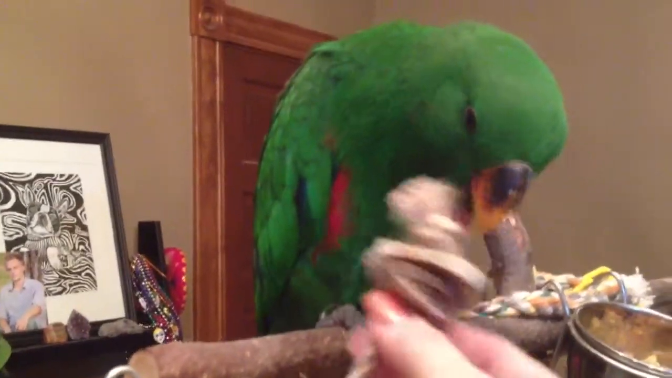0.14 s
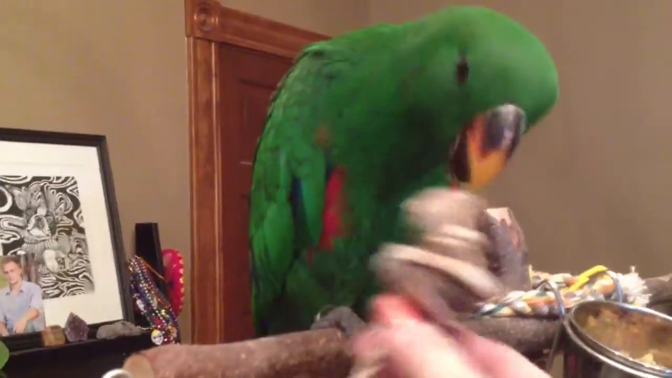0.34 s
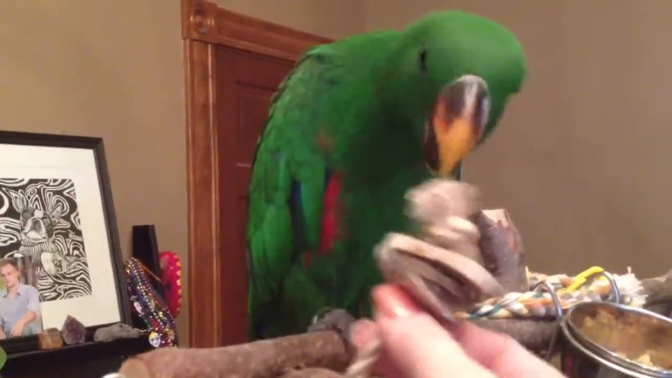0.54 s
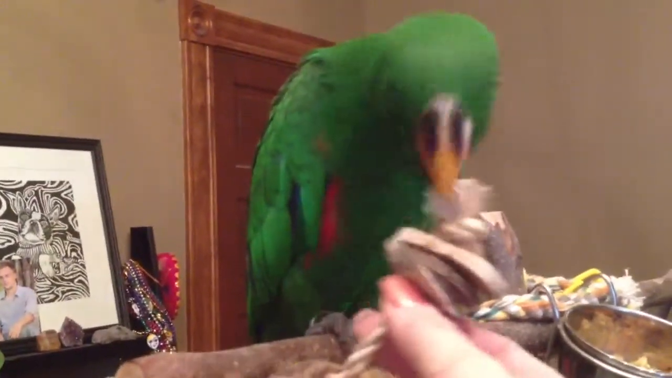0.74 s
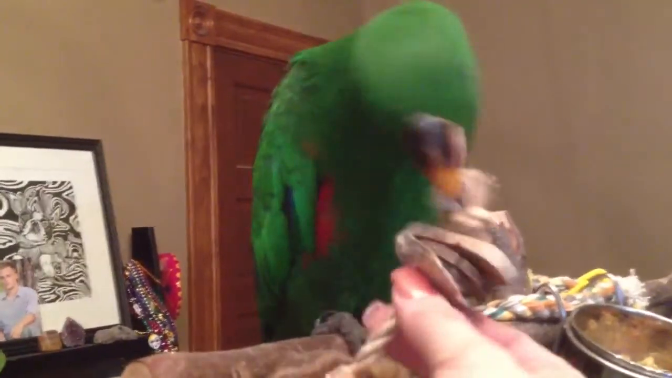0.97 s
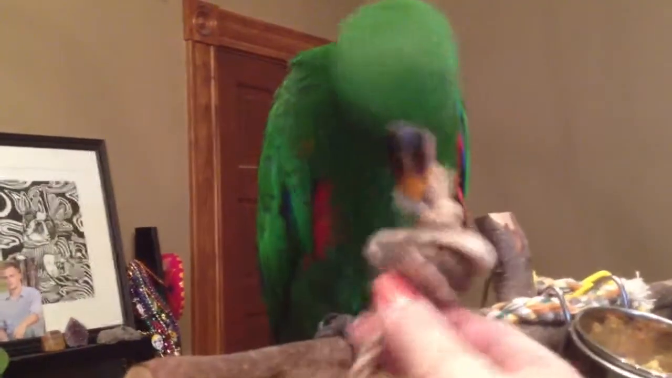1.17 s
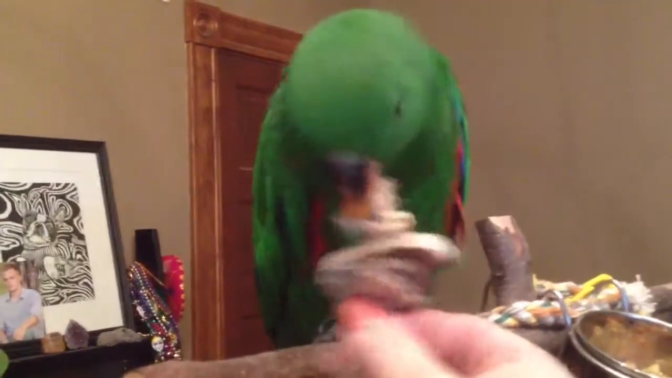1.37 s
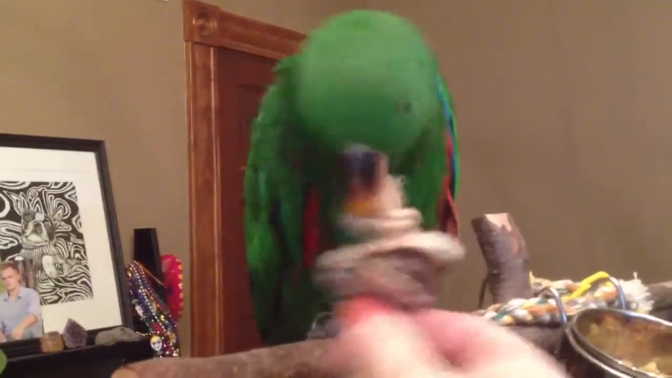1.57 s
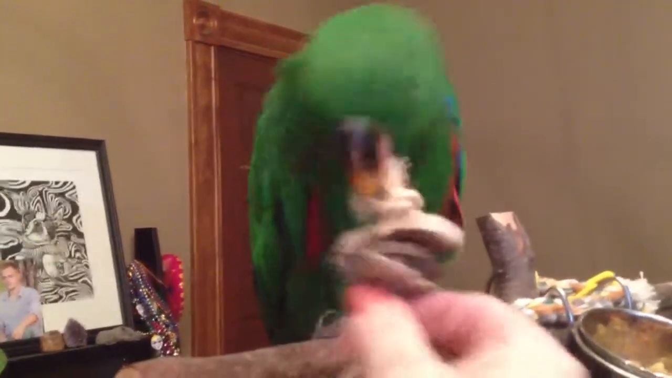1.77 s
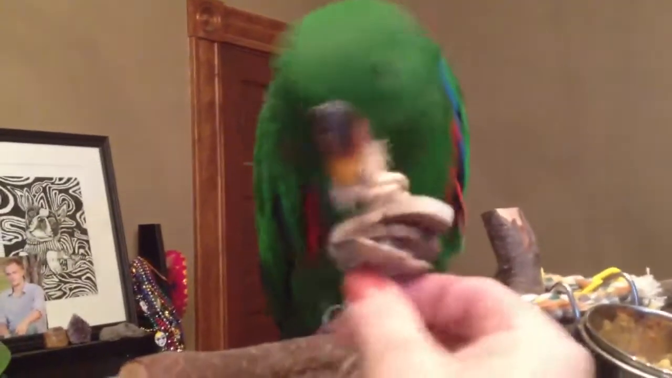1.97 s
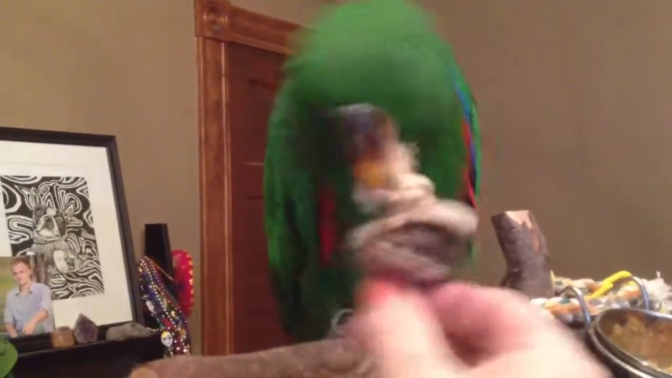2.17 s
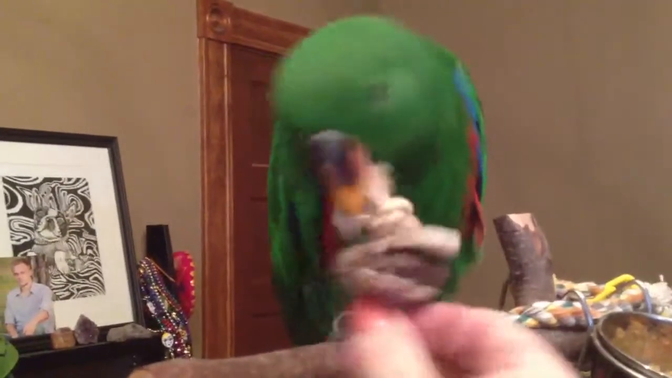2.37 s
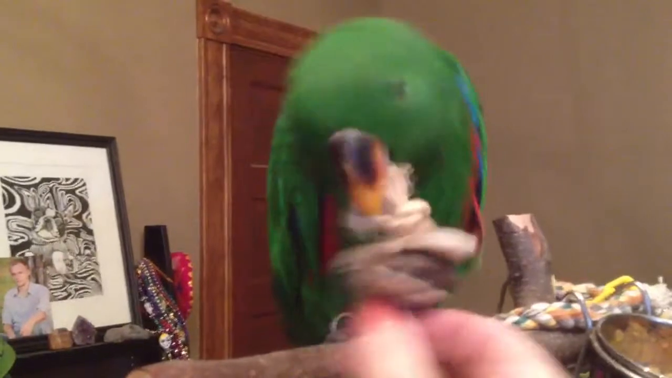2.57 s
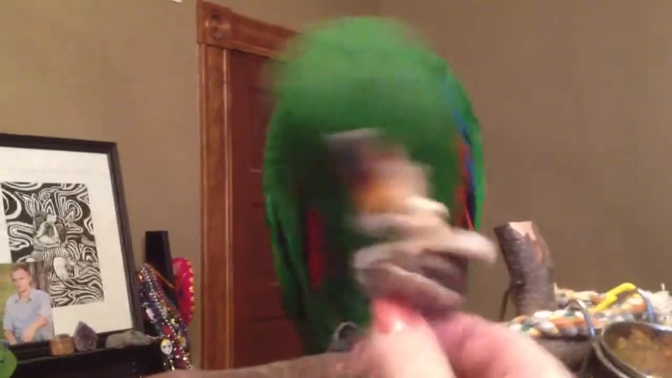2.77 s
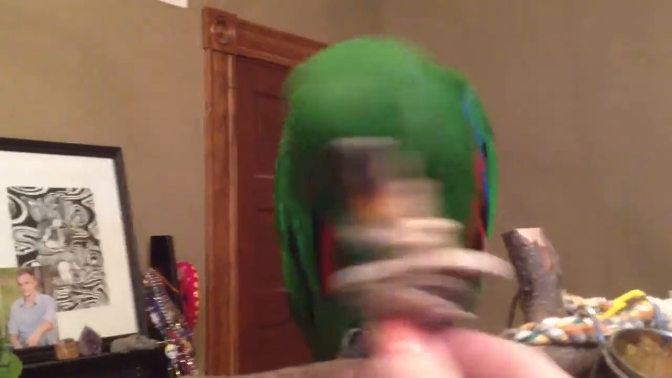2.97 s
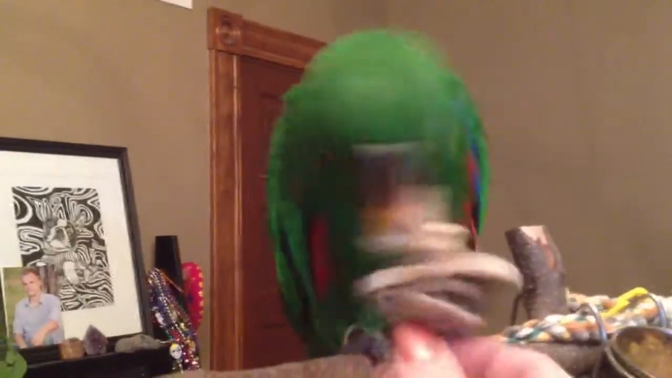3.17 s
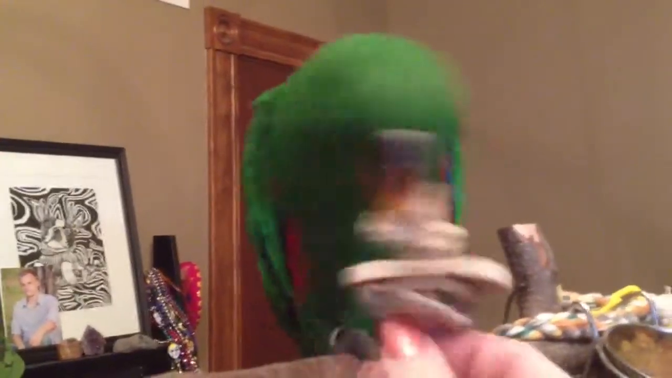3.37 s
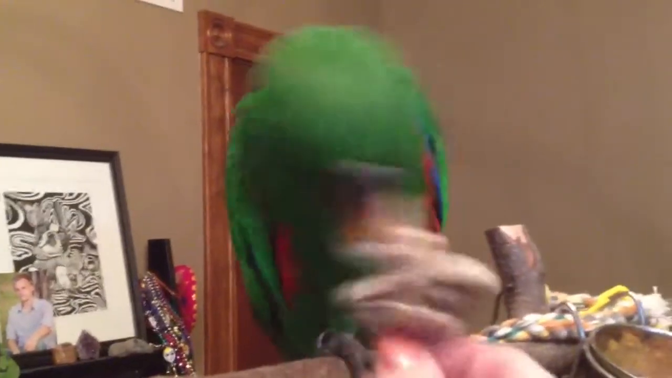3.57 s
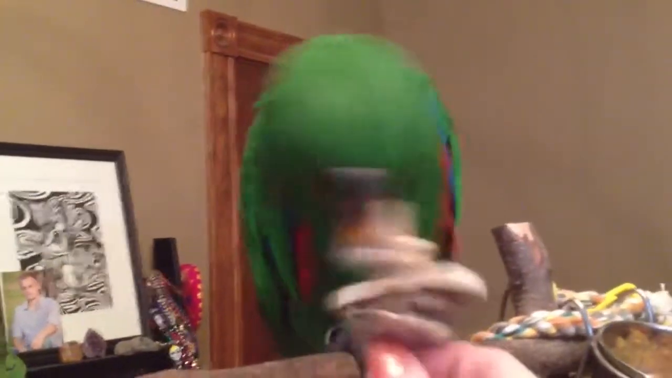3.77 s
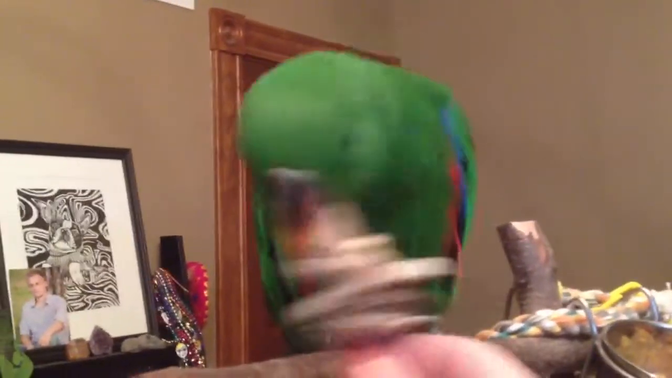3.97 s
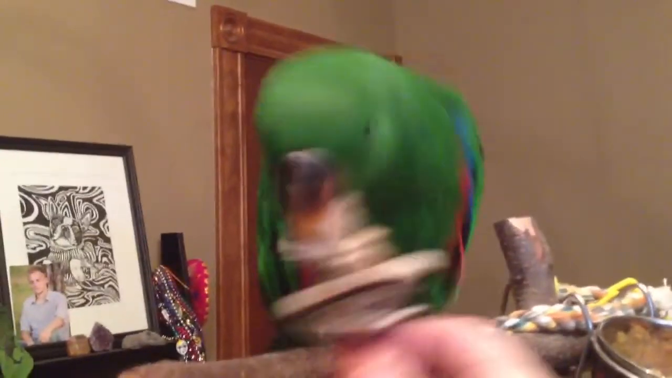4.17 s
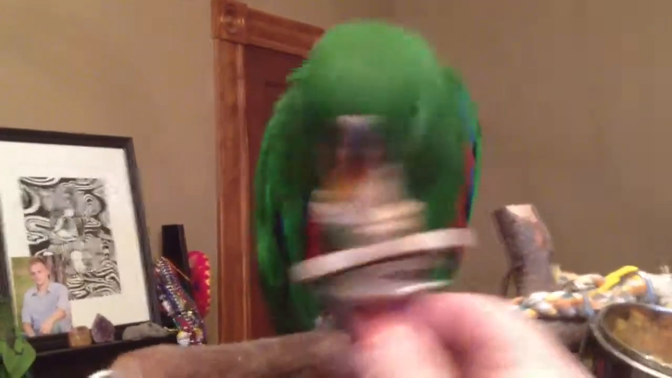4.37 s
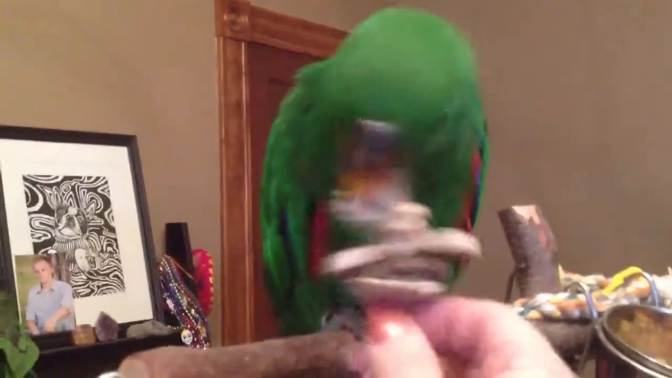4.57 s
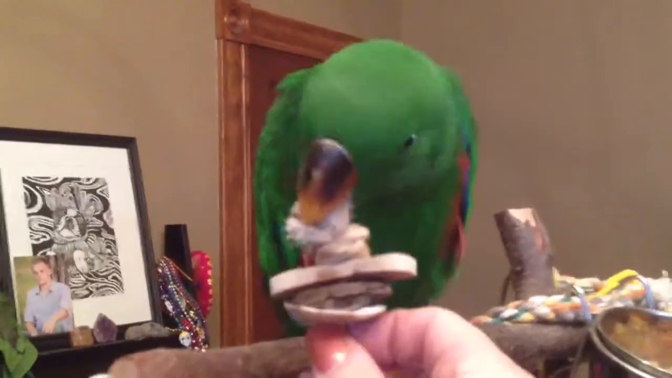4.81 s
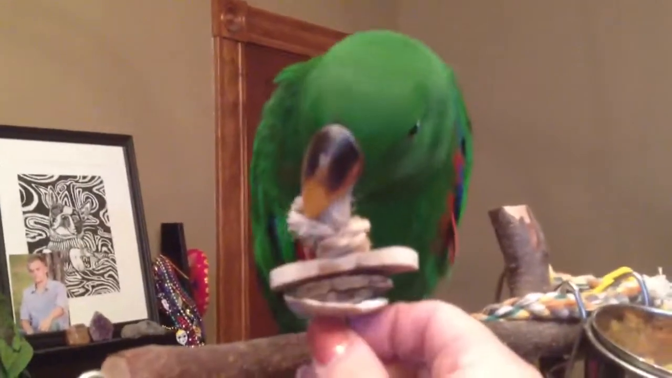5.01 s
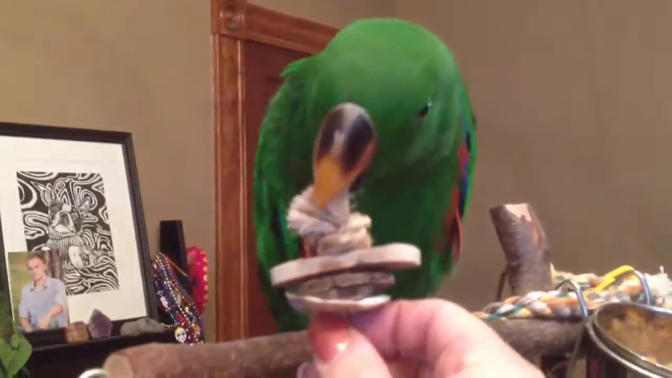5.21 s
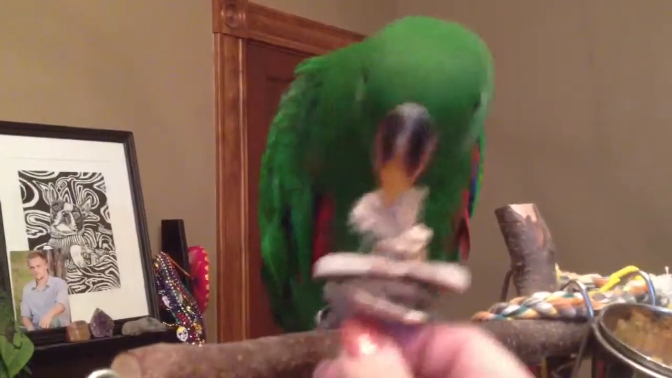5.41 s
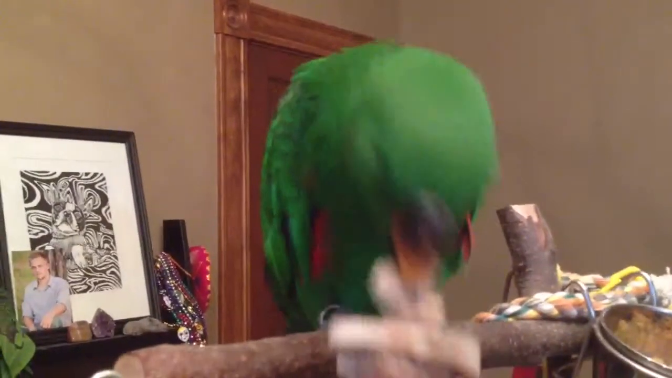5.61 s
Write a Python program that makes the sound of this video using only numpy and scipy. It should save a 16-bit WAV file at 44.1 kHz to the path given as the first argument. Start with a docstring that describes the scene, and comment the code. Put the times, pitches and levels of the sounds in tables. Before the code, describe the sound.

A parrot nibbles a rope toy strung with hard discs, then shakes it fast, making dense bright clacking that stops abruptly into quiet scrapes.

```python
"""Parrot shaking a rope toy

A parrot nibbles a rope toy strung with hard discs, then shakes it about five times a second, close by.
Disc contacts are noise-chattered knocks plus decaying modes; rope, fibres and beak are filtered random slips.
Swings and tugs add a drag of rope and a hollow swish; a small metal link rings faintly near the end.
A soft noise thump comes late; decaying-noise tails give the toy a small room, over air and a faint hum."""
import sys
import numpy as np
from scipy import signal
from scipy.fft import rfft, irfft, next_fast_len
from scipy.io import wavfile
from scipy.ndimage import map_coordinates

SR = 44100
rng = np.random.default_rng(int(sys.argv[2]) if len(sys.argv) > 2 else 0)


def persist_wave(psi):
    """Save psi, clipped to +-1, as 16-bit WAV."""
    counts = np.round(np.clip(psi, -1, 1) * 32767).astype(np.int16)
    wavfile.write(sys.argv[1], SR, np.atleast_2d(counts).T)


N = 249076
TIME_S = np.arange(N) / SR
TOP_HZ = 15200  # upper band limit


def amp(db):
    """Amplitude factor of a level in dB."""
    return 10 ** (np.asarray(db) / 20)


def unit(x):
    """x scaled to rms 1."""
    return x / np.sqrt(np.mean(x ** 2) + 1e-20)


def along(points, hz):
    """Interpolate (f/Hz, value) points on a log frequency axis."""
    f, v = np.transpose(points)
    return np.interp(np.log(hz + 1), np.log(f + 1), v)


def curves(rows):
    """One value per sample for each column after the time."""
    s, *cols = np.transpose(rows)
    return [np.interp(TIME_S, s, c) for c in cols]


def wobble(rate_hz):
    """Smooth random curve through rate_hz knots per second."""
    knots = rng.standard_normal(int(N * rate_hz / SR) + 4)
    return map_coordinates(knots, [np.arange(N) * rate_hz / SR])


def bell(s, length_s):
    """Gaussian rise and fall of one stroke centred on s."""
    return np.exp(-.5 * np.minimum(((TIME_S - s) / length_s) ** 2, 100))


def filtered(x, response):
    """x times a complex response of frequency."""
    m = next_fast_len(N + SR // 2)
    return irfft(rfft(x, m) * response(np.fft.rfftfreq(m, 1 / SR)), m)[:N]


def coloured(x, spectrum):
    """x shaped by (f/Hz, gain/dB) points, at rms 1."""
    return unit(filtered(x, lambda hz: amp(along(spectrum, hz))))


def resonant(x, peaks):
    """x through parallel (f/Hz, width/Hz, gain/dB) resonances of alternating sign, at rms 1."""
    def response(f):
        total = 0
        for k, (centre, width, db) in enumerate(peaks):
            damping = 1j * f * width
            total = total + (-1) ** k * amp(db) * damping / (centre * centre - f * f + damping)
        return total
    return unit(filtered(x, response))


def causal(gain):
    """Minimum-phase, sharp-fronted pulse with this gain over frequency."""
    cepstrum = irfft(np.log(np.maximum(gain, 1e-6)))
    half = len(cepstrum) // 2
    folded = np.r_[cepstrum[0], 2 * cepstrum[1:half], np.zeros(half)]
    return irfft(np.exp(rfft(folded)))


def slips(rate_hz, spread_db):
    """Friction: tiny catches at random times, of very uneven size, at rms 1."""
    catches = rng.random(N) < rate_hz / SR
    size = amp(spread_db * np.minimum(rng.standard_normal(N), 2.5))
    return unit(catches * rng.choice([-1, 1], N) * size)


def add(track, s, sound):
    """Mix a sound into a track at a time."""
    part = track[max(round(s * SR), 0):][:len(sound)]
    part += sound[:len(part)]


# One swing: discs glance off each other brightly, then land flat and dull as the head turns.
# t from turn/s, activity/dB, brightness/(dB/octave)
SWING_STROKE = [(-0.14, -0.5, 1), (-0.095, -2, -1.5), (-0.066, 1, 7), (-0.039, 2.5, 4), (-0.022, 2.5, -3),
                (0.04, -1, -3)]
SHAKE_START_S, BEAT_S, SWING_COUNT = 1.762, 0.206, 14
CALM_DB_PER_OCT = -1.9  # brightness outside the shaking
BRIGHTENING_DB_PER_OCT_S = 1.23  # per second of shaking, zero at its middle


def stroke_cycle():
    """Activity/dB and brightness/(dB/octave) per sample: one stroke repeats while the head shakes."""
    since_start = TIME_S - SHAKE_START_S
    s, activity, bright = np.transpose(SWING_STROKE)
    from_middle = since_start - BEAT_S * SWING_COUNT / 2
    shaking = np.abs(from_middle) < BEAT_S * (SWING_COUNT - 1) / 2
    repeat = lambda values: np.interp(since_start, s, values, period=BEAT_S)
    shaken_bright = repeat(bright) + BRIGHTENING_DB_PER_OCT_S * from_middle
    return np.where(shaking, repeat(activity), 0), np.where(shaking, shaken_bright, CALM_DB_PER_OCT)


# Hum course: t/s, relative level/dB
HUM_COURSE = [(0, -69.5), (.4, -78), (1.8, -78), (2.2, -85), (4.2, -88), (5.65, -88)]
# Room air spectrum: f/Hz, relative level per Hz/dB
AIR_SPECTRUM = [(25, -5), (60, -21), (125, -5), (200, -3), (240, 2), (295, -3), (420, -1.5), (800, -9.5),
                (2000, -16.5), (6000, -21), (15000, -18.5)]


def background(air_db, hum_db, hum_hz, octave_db):
    """Room air as shaped noise; hum as a sine and its octave, wavering in pitch and level."""
    phase = 2 * np.pi * np.cumsum(hum_hz + 1.48 * wobble(12)) / SR
    tone = unit(np.sin(phase) + amp(octave_db) * np.sin(2 * phase))
    hum = amp(curves(HUM_COURSE)[0] + hum_db + 1.4 * wobble(11)) * tone
    return hum + amp(air_db) * coloured(rng.standard_normal(N), AIR_SPECTRUM)


# How hard the toy is worked: t/s, effort as relative rustle level/dB
EFFORT = [(0, -75), (0.4, -72), (1.25, -64), (1.55, -64), (2.05, -64), (2.35, -60), (2.65, -60.5),
          (2.87, -56), (3.1, -57.5), (3.45, -55.5), (3.65, -55.5), (3.9, -59.5), (4.3, -53.5),
          (4.55, -54.5), (4.72, -56.5), (5.1, -71.5), (5.35, -66), (5.64, -67.5)]
# Beak gnaws, fibres tear: t/s, fizz level/dB
FIBRE_TEARS = [(0.11, -75.5), (0.665, -61), (1.11, -66), (1.68, -61.5), (5.41, -68), (5.62, -68)]
# Rope friction spectrum: f/Hz, relative level per Hz/dB
ROPE_SPECTRUM = [(300, -39), (900, -1.5), (2000, -1.5), (3500, 0), (4400, 6.5), (5100, -22), (5700, 1),
                 (7700, -4), (9000, -3.5), (15000, -19)]
# Fibre spectrum: f/Hz, relative level per Hz/dB
FIBRE_SPECTRUM = [(2000, -21), (6000, -3.5), (8000, -5.5), (10000, -12), (12000, -3), (15000, -7.5)]
# Dry contact of discs: f/Hz, relative level/dB
KNOCK_SPECTRUM = [(100, -72), (300, -37), (1100, -10.5), (2000, -2.5), (3300, -2.5), (4400, 2), (5200, -10),
                  (8000, -9.5), (9500, -31), (12000, -22.5), (15500, -37)]
# Modes of each hard piece, main mode first: f/Hz, relative level/dB, t60/s
PIECE_MODES = [
    [(4550, 3, 0.013), (3830, -3.5, 0.016), (8250, -38, 0.036)],
    [(4130, 3, 0.028), (7560, 2.5, 0.016), (10740, -10, 0.0054)],
    [(5660, 2, 0.018), (4490, -5.5, 0.024), (6840, -16.5, 0.014)],
    [(10000, -3.5, 0.017), (11300, -18, 0.028), (7100, -13, 0.01)],
]


def rustle(rope_db, fizz_db, tick_db, tap_db, jiggle_db, fizz_growth):
    """Rope drags through discs, single fibres snap, loose pieces tap and jiggle, all with the effort."""
    effort = curves(EFFORT)[0] + stroke_cycle()[0]
    # fizz grows more slowly than the rest and swells with each gnaw
    mean_effort = effort.mean()
    fraying = amp(mean_effort + fizz_growth * (effort - mean_effort) + fizz_db)
    fraying = fraying + sum(amp(db) * bell(s, length_s=0.021) for s, db in FIBRE_TEARS)
    rope = coloured(slips(rate_hz=1800, spread_db=5), ROPE_SPECTRUM)
    fizz = coloured(slips(rate_hz=3500, spread_db=4), FIBRE_SPECTRUM)
    ticks = coloured(slips(rate_hz=50, spread_db=4), FIBRE_SPECTRUM)
    taps = coloured(slips(rate_hz=70, spread_db=3), KNOCK_SPECTRUM)
    jiggle = 0
    for modes in PIECE_MODES[:3]:
        # mode width follows from decay time
        peaks = [(f, np.log(1000) / np.pi / t60, db) for f, db, t60 in modes]
        jiggle = jiggle + resonant(slips(rate_hz=30, spread_db=3), peaks)
    flutter_db = 1.8 * wobble(40)
    mix = amp(rope_db) * rope + amp(tap_db) * taps + amp(jiggle_db) * jiggle
    body = amp(effort + flutter_db) * mix
    return body + fraying * (amp(flutter_db) * fizz + amp(tick_db) * ticks)


# Beak strokes over the knot: t/s, relative level/dB, length/s, favoured f/Hz
BEAK_STROKES = [(0.256, -61, 0.014, 2940), (0.292, -56, 0.0023, 1450), (1.01, -62, 0.027, 1600),
                (1.392, -53.5, 0.014, 2300), (1.668, -46.5, 0.007, 1610), (1.689, -47, 0.014, 1240),
                (1.74, -45, 0.0088, 3500), (1.76, -72, 0.013, 2400), (4.848, -53.5, 0.0073, 1980),
                (4.998, -60.5, 0.0088, 1700)]
# Beak resonances: f/Hz, width/Hz, relative gain/dB
BEAK_RESONANCES = [(1270, 360, 3.5), (1780, 270, 2), (2280, 310, -3), (2980, 290, 3.5), (3430, 150, 6)]


def scrapes(db, falloff_db_per_oct):
    """Beak slips over the knot through its resonances; each stroke favours another frequency."""
    friction = resonant(slips(rate_hz=940, spread_db=3), BEAK_RESONANCES)
    track = np.zeros(N)
    for s, level, length_s, centre_hz in BEAK_STROKES:
        favour = lambda hz: amp(-falloff_db_per_oct * np.abs(np.log2((hz + 1) / centre_hz)))
        track += amp(db + level) * bell(s, length_s) * unit(filtered(friction, favour))
    return track


def light_contacts(knock_db, ring_db, spread_db, crowding, detune, count=80):
    """Random small contacts, denser and louder with effort; rows as in LOUD_CONTACTS."""
    effort = curves(EFFORT)[0] + stroke_cycle()[0]
    chance = np.cumsum(amp(crowding * effort))
    place, knock, ring, piece, grip = rng.random((count, 5)).T
    at = np.searchsorted(chance, (np.arange(count) + place) / count * chance[-1])
    main_hz = np.array([PIECE_MODES[int(k)][0][0] for k in 3 * piece])
    pitch_hz = main_hz * (1 + detune * (2 * grip - 1))
    level = lambda db, draw: effort[at] + db + spread_db * (2 * draw - 1)
    return list(zip(at / SR, level(knock_db, knock), level(ring_db, ring), pitch_hz))


# Loud disc contacts: t/s, relative knock level/dB, relative ring level/dB, ringing piece f/Hz
LOUD_CONTACTS = [(0.429, -41.5, -44, 10000), (0.571, -45, -45, 4550), (0.585, -36, -37.5, 5660),
                 (0.693, -25.5, -63, 5660), (0.898, -38, -46, 5660), (1.301, -25, -41, 4130),
                 (1.4223, -27, -50, 5660), (1.491, -24, -38.5, 4130), (1.6315, -29.5, -35, 4550),
                 (1.734, -18, -41.5, 4550), (1.854, -34, -44.5, 4130), (1.9338, -17, -44, 4130),
                 (1.9439, -18, -45, 4130), (1.9493, -14, -24, 4550), (2.1277, -15, -33, 5660),
                 (2.1425, -6, -68, 4550), (2.1648, 5, -20.5, 4550), (2.225, -9.5, -28, 4550),
                 (2.3186, -13, -41, 4130), (2.343, -13, -33.5, 4130), (2.3681, -17.5, -39, 4550),
                 (2.4609, -18, -41, 4550), (2.5217, -12.5, -37.5, 4130), (2.727, -13, -38, 4130),
                 (2.7468, -19, -26, 4130), (2.7513, 0, -21.5, 5660), (2.755, 1, -28, 5660),
                 (2.7898, -4.5, -43, 4550), (2.8032, -5, -24, 4550), (2.9359, -8.5, -29.5, 4550),
                 (2.9745, -16, -28, 4550), (2.9848, -5.5, -29.5, 4130), (2.9941, -12.5, -24, 5660),
                 (3.049, -20.5, -39, 5660), (3.1058, -12, -36.5, 5660), (3.1396, -15, -45, 4130),
                 (3.167, -5.5, -41, 4130), (3.1726, -11, -38, 5660), (3.1784, -12, -37, 4130),
                 (3.2274, -27, -34.5, 5660), (3.2625, -4.5, -42, 5660), (3.293, -9, -26, 5660),
                 (3.3193, -17, -35, 5660), (3.339, -20, -38, 10000), (3.355, -9, -36, 4130),
                 (3.3644, -23, -33.5, 4130), (3.3921, 1, -22, 4550), (3.546, -17, -31, 10000),
                 (3.5698, -10, -49, 4130), (3.6024, -16, -45, 10000), (3.6686, -10, -31.5, 5660),
                 (3.7479, -15, -27, 10000), (3.7588, -5.5, -37, 4130), (3.795, -13, -50, 4130),
                 (3.9554, -29, -29.5, 10000), (3.9595, -3.5, -31.5, 4130), (3.998, -15, -25, 4550),
                 (4.0112, -7, -34, 4550), (4.167, -13, -33.5, 4130), (4.1824, -12, -22.5, 10000),
                 (4.1974, -7, -35, 4550), (4.2194, -2, -50, 4550), (4.3044, -17.5, -31, 5660),
                 (4.374, -19, -37.5, 5660), (4.3804, -17, -30, 10000), (4.4027, -13, -50, 10000),
                 (4.4218, -14, -40, 5660), (4.5988, -13, -33, 4550), (4.6204, -1, -21.5, 4550),
                 (4.6685, -17, -39, 4550)]
FIRM_DB = -12  # knock level of an ordinary firm contact, on the table's scale
FORCE_BRIGHT = 0.41  # (dB/octave) per dB of knock above FIRM_DB


def clacks(contacts, knock_db, ring_db, chatter_db, chatter_t60_s, ripple_points=14):
    """Each contact gives a dry knock and rings one piece; hard and glancing contacts are brighter."""
    track = np.zeros(N)
    t = np.arange(2048) / SR
    hz = np.fft.rfftfreq(len(t), 1 / SR)
    glance = stroke_cycle()[1]
    for s, knock, ring, pitch_hz in contacts:
        excess_db = max(knock - FIRM_DB, 0)
        bright = glance[int(s * SR)] + FORCE_BRIGHT * excess_db
        tilt = lambda f: bright * np.log2(np.clip(f, 1000, 11000) / 5000)
        # faces chatter briefly after impact, relatively less on hard blows
        chatter = np.diff(rng.standard_normal(len(t) + 1))
        force = amp(chatter_db - excess_db / 2 - 60 * t / chatter_t60_s) * chatter
        force[0] = 1
        # each contact point colours the knock, most in the treble
        ripple_db = np.linspace(0, 5, ripple_points) * rng.standard_normal(ripple_points)
        ripple = np.interp(hz, np.linspace(0, TOP_HZ, ripple_points), ripple_db)
        colour = causal(amp(along(KNOCK_SPECTRUM, hz) + tilt(hz) + ripple))
        add(track, s, amp(knock + knock_db) * signal.fftconvolve(force, colour))
        modes = min(PIECE_MODES, key=lambda piece: abs(piece[0][0] - pitch_hz))
        for mode_hz, db, t60 in modes:
            # grip shifts each mode a little
            f = mode_hz * pitch_hz / modes[0][0] * (1 + .008 * rng.standard_normal())
            level = ring + ring_db + db + tilt(f) + rng.standard_normal()
            add(track, s, amp(level - 60 * t / t60) * np.cos(2 * np.pi * f * t))
    return track


# Single tugs off the beat: t/s, relative swish level/dB
SINGLE_TUGS = [(1.339, -61.5), (1.85, -67), (4.613, -61.5)]
# Hollow swish resonances: f/Hz, width/Hz, relative gain/dB
SWISH_RESONANCES = [(567, 200, -8.5), (624, 54, 1), (731, 64, 1.5), (984, 120, -9), (1700, 1400, -12.5)]
FIRST_SWISH_DB, GROWTH_DB_PER_S = -65, 2.7  # first level on the tugs' scale; ever harder shaking


def swings(db, length_s, drag_db, lead_s):
    """Each swing or tug pulls rope through the discs, then gives a hollow swish."""
    since_start = BEAT_S * np.arange(SWING_COUNT)
    beats = [(SHAKE_START_S + s, FIRST_SWISH_DB + GROWTH_DB_PER_S * s) for s in since_start]
    stroke = lambda early_s: sum(amp(level) * bell(s - early_s, length_s) for s, level in beats + SINGLE_TUGS)
    swish = stroke(0) * resonant(slips(rate_hz=4000, spread_db=4.5), SWISH_RESONANCES)
    drag = stroke(lead_s) * coloured(slips(rate_hz=1300, spread_db=1.5), ROPE_SPECTRUM)
    return amp(db) * swish + amp(drag_db) * drag


# Touches of a small metal link: t/s, relative level/dB
LINK_TOUCHES = [(4.835, -63), (5.016, -67), (5.606, -62)]
# Link modes: f/Hz, relative level/dB, t60/s
LINK_MODES = [(4160, 0, 0.29), (12200, 4.5, 0.15)]


def tings(db):
    """Decaying link modes ring faintly and unevenly when the toy is nudged."""
    track, t = np.zeros(N), np.arange(SR // 2) / SR
    ring = sum(amp(level - 60 * t / t60) * np.sin(2 * np.pi * hz * t) for hz, level, t60 in LINK_MODES)
    for s, level in LINK_TOUCHES:
        add(track, s, amp(db + level) * ring)
    return track * (.5 + .8 * wobble(140))


# Thump spectrum: f/Hz, relative level per Hz/dB
THUMP_SPECTRUM = [(60, -42), (130, 5.5), (450, 3.5), (700, -4), (2200, -9.5), (4000, -36), (9000, -38)]


def thump(start_s, db, t60_s):
    """Soft, dull bump against the perch: shaped noise with a 1.4 ms rise and exponential decay."""
    t = np.maximum(TIME_S - start_s, 0)
    envelope = amp(db - 60 * t / t60_s) * (1 - np.exp(-t / 0.0014))
    return envelope * coloured(rng.standard_normal(N), THUMP_SPECTRUM)


# Room decay: f/Hz, t60/s
ROOM_DECAY = [(200, 1), (1500, 0.2), (5000, 0.17), (12000, 0.18)]


def room(x, count=4):
    """Walls answer with decaying-noise tails, alternating every 1/12 s as the toy moves about."""
    out = np.zeros(N)
    place = np.arange(N) // (SR // 12) % count
    for k in range(count):
        hz, t, z = signal.stft(rng.standard_normal(SR // 2), SR, nperseg=256)
        decay = amp(-60 * t / along(ROOM_DECAY, hz)[:, None])
        tail = signal.istft(z * decay, SR, nperseg=256)[1]
        tail = np.r_[np.zeros(round(.004 * SR)), tail / np.linalg.norm(tail)]  # 4 ms delay
        out += signal.fftconvolve(x * (place == k), tail)[:N]
    wall_tone = [(300, -1), (2000, 6), (5000, -1.5), (12000, -5.5)]  # f/Hz, gain/dB
    return filtered(out, lambda hz: amp(along(wall_tone, hz)))


def scene():
    """Toy with its room answer, plus the dry bump and the background."""
    contacts = LOUD_CONTACTS + light_contacts(knock_db=32, ring_db=9, spread_db=6, crowding=0.9, detune=0.038)
    toy = rustle(rope_db=-4, fizz_db=-3.0, tick_db=-2.5, tap_db=-11, jiggle_db=-13, fizz_growth=0.68)
    toy = toy + scrapes(db=-5.5, falloff_db_per_oct=10)
    toy = toy + clacks(contacts, knock_db=-2.5, ring_db=-3, chatter_db=-9.0, chatter_t60_s=0.017)
    toy = toy + swings(db=3.5, length_s=0.017, drag_db=5.0, lead_s=0.026)
    toy = toy + tings(db=3)
    bump = thump(start_s=5.346, db=-54.0, t60_s=0.4)
    backdrop = background(air_db=-69.0, hum_db=-0.5, hum_hz=87.5, octave_db=-4.5)
    return (toy + amp(-12) * room(toy) + bump + backdrop)[None]


def record(dry):
    """Microphone drops the deep bass; recorder cuts steeply above its band limit."""
    highpass = signal.butter(4, 78.5, "highpass", fs=SR, output="sos")
    thin = signal.sosfilt(highpass, dry[0])
    return filtered(thin, lambda hz: 1 / np.sqrt(1 + (hz / TOP_HZ) ** 120))[None]


dry = scene()
out = record(dry)
persist_wave(out)
```